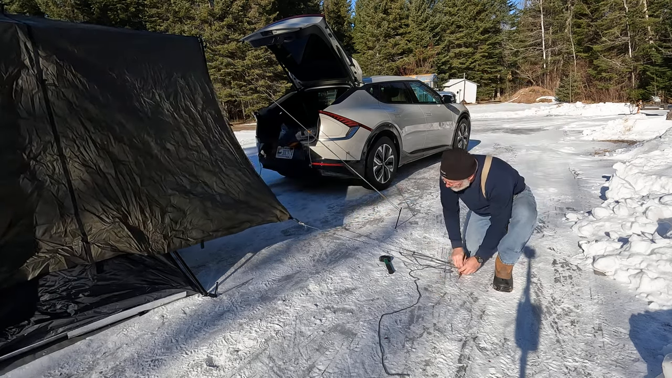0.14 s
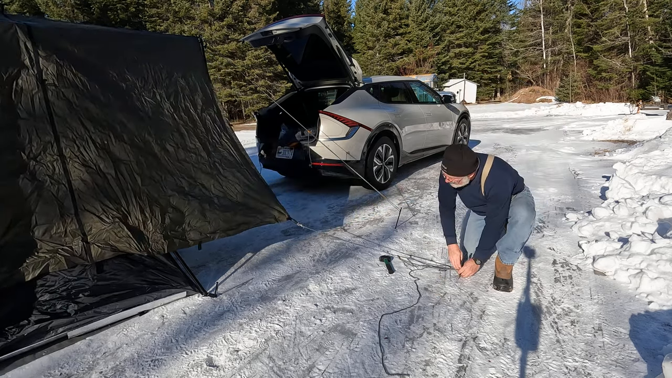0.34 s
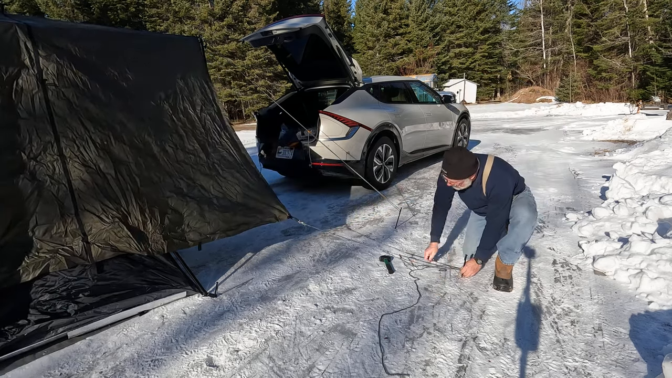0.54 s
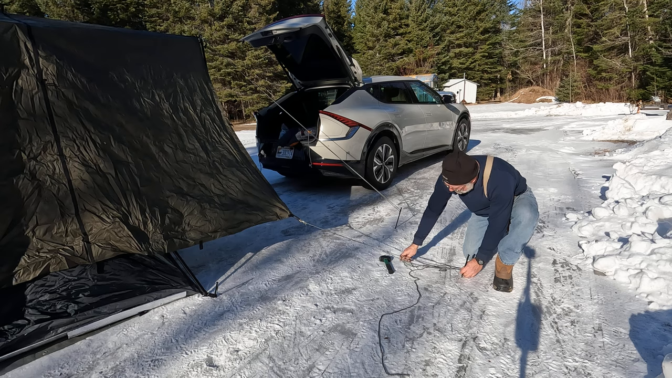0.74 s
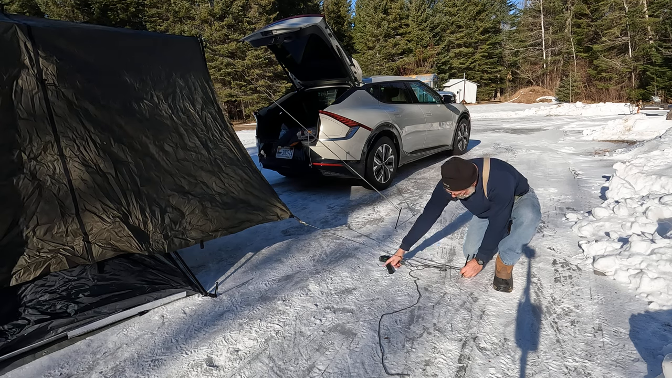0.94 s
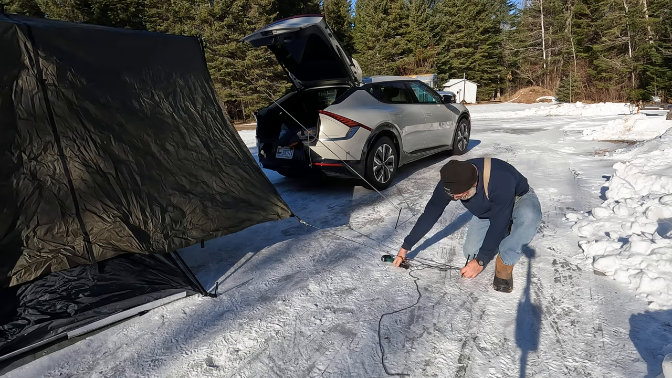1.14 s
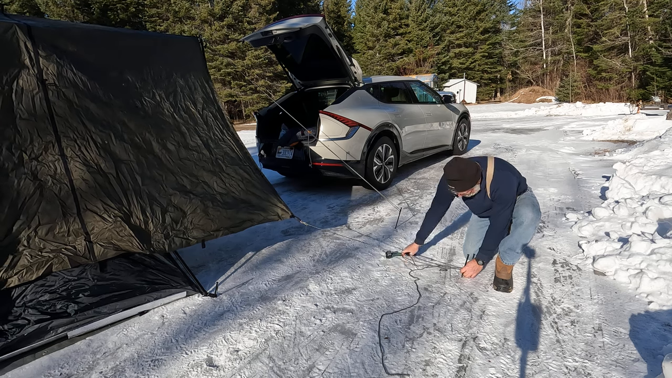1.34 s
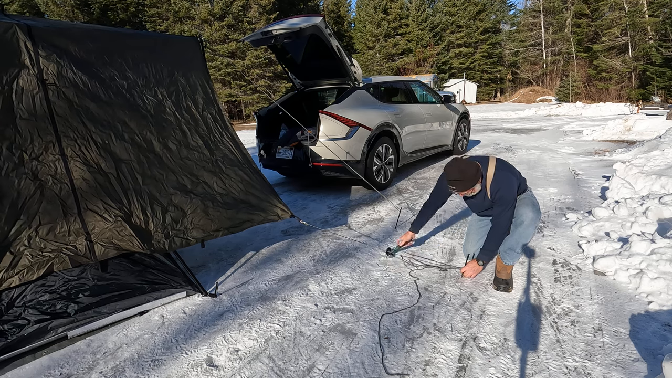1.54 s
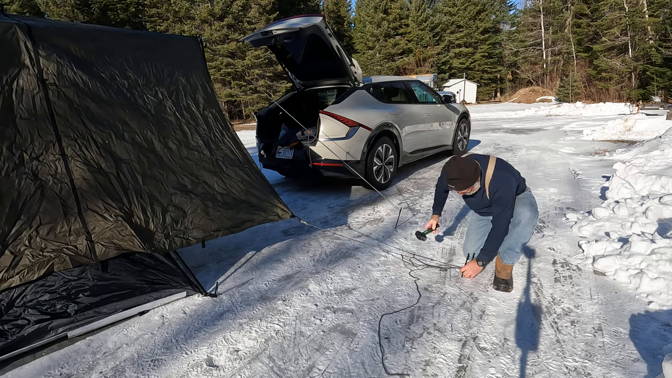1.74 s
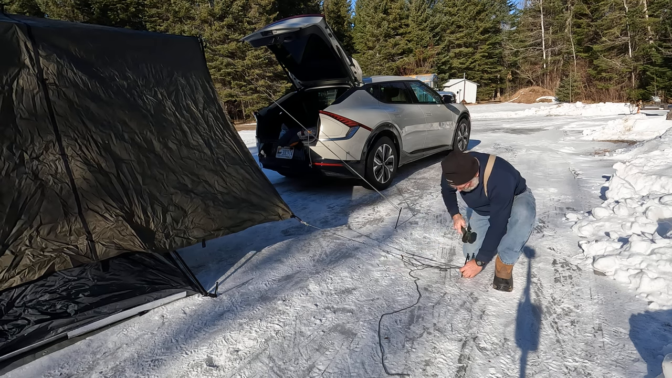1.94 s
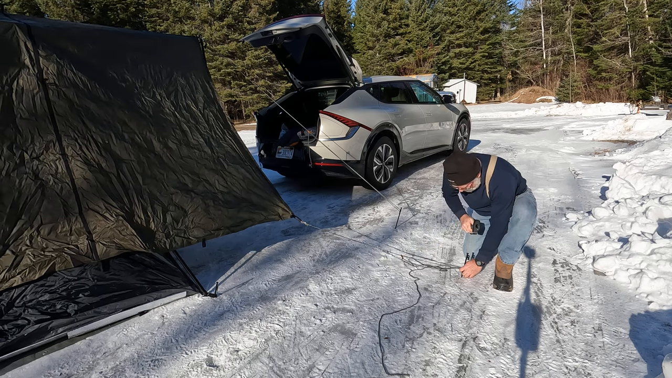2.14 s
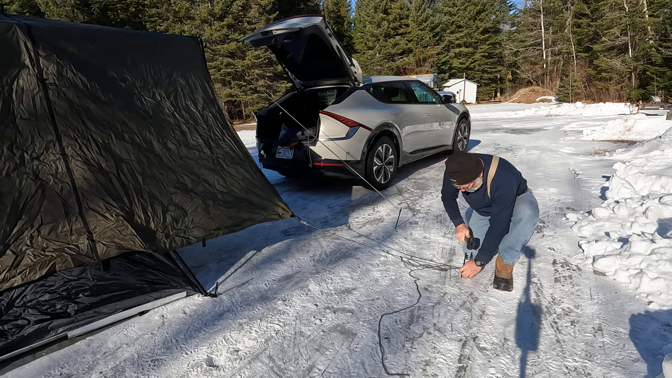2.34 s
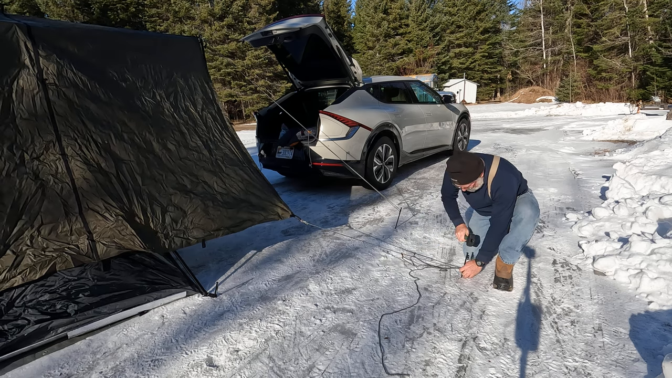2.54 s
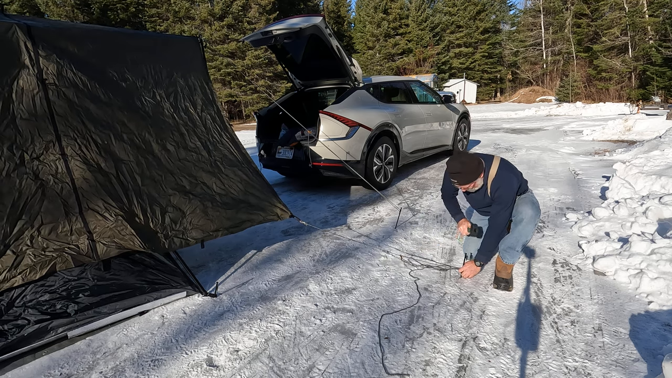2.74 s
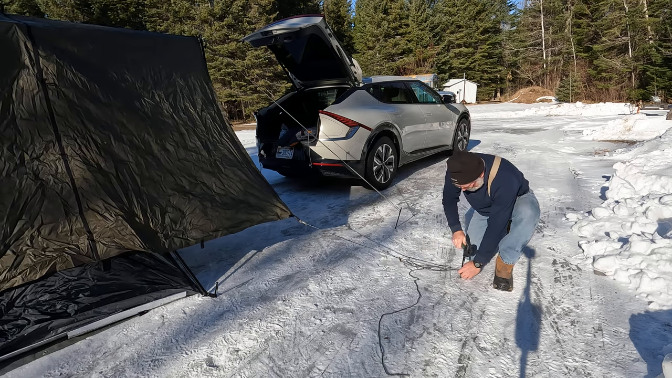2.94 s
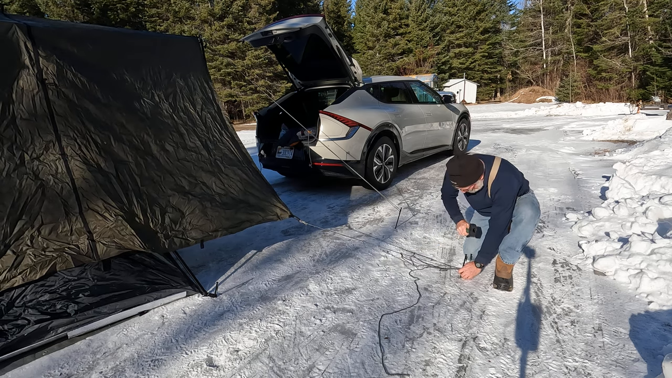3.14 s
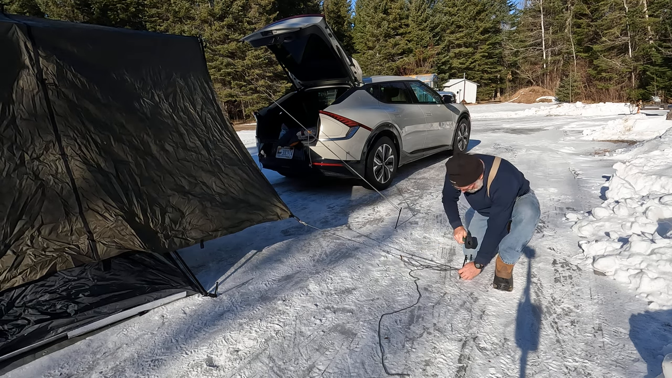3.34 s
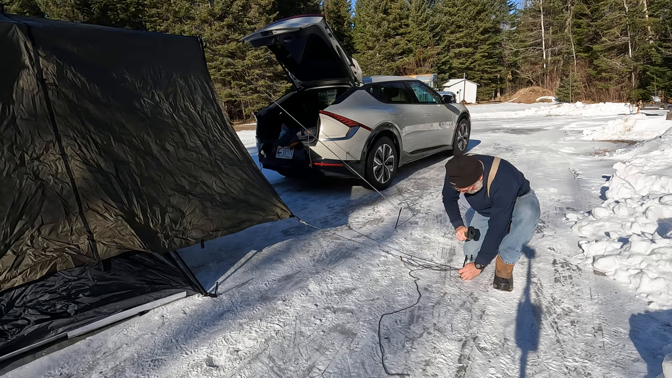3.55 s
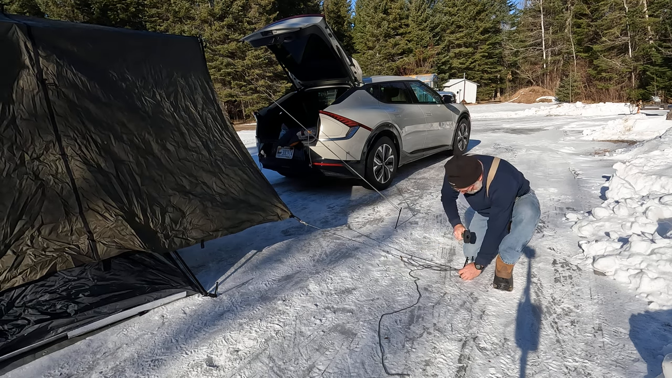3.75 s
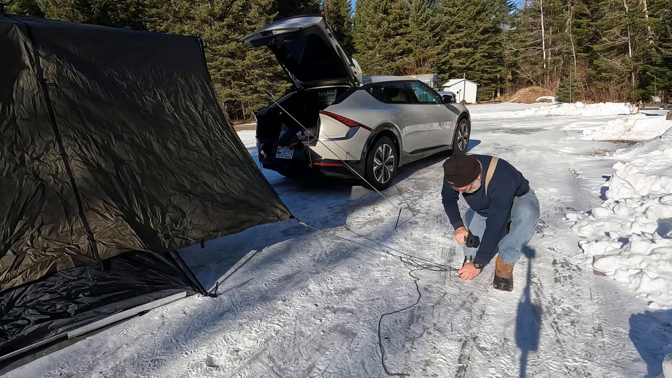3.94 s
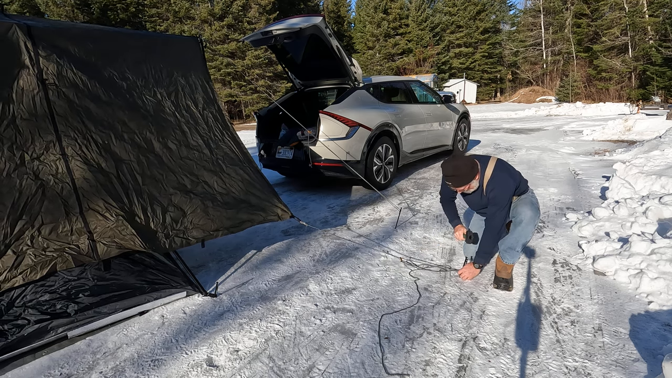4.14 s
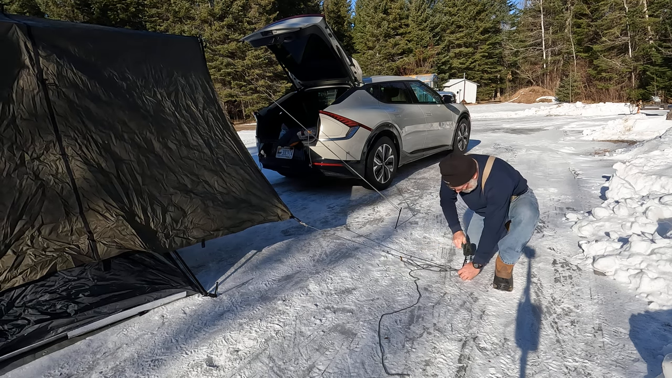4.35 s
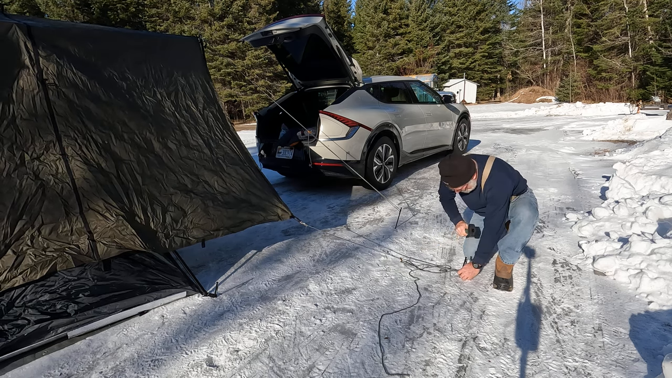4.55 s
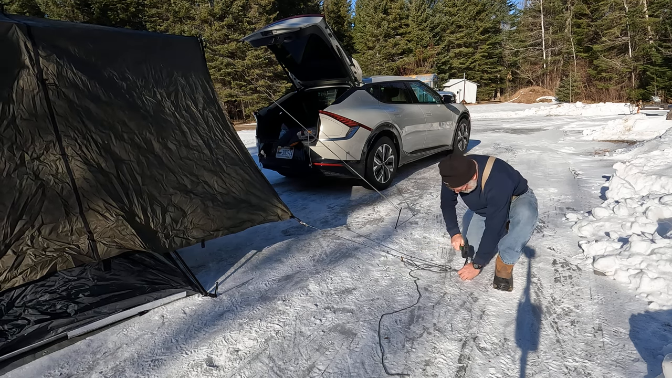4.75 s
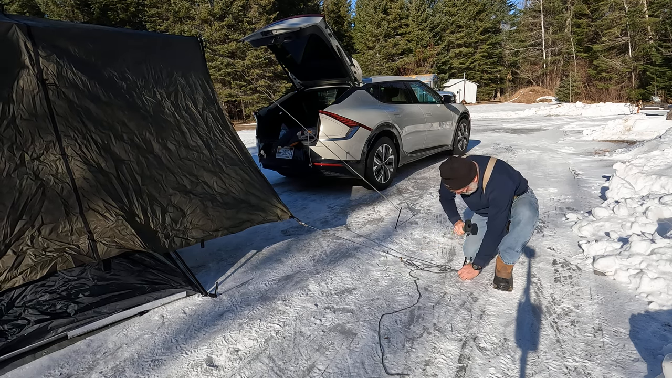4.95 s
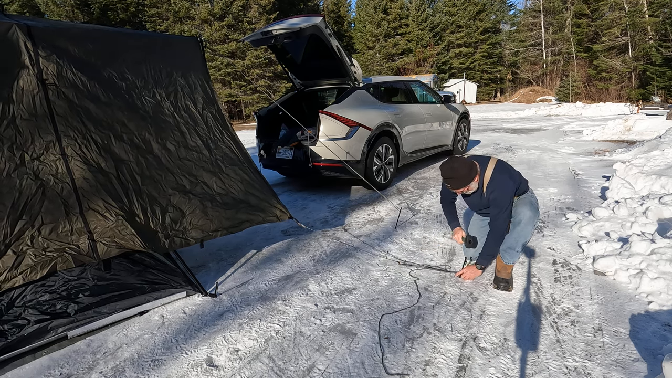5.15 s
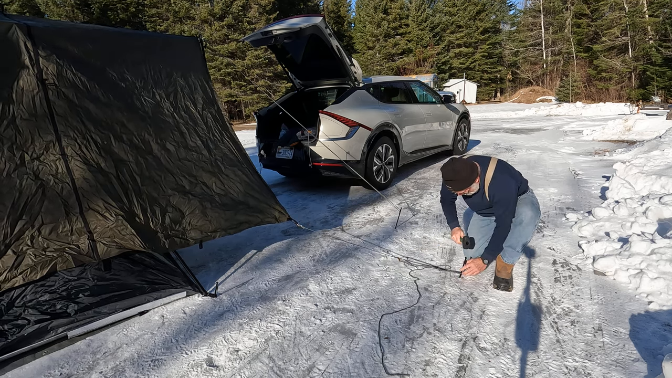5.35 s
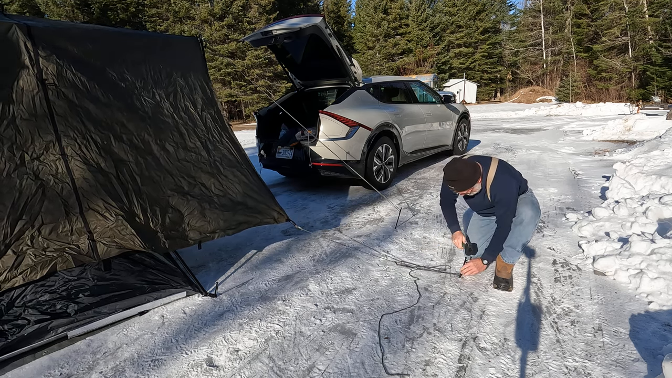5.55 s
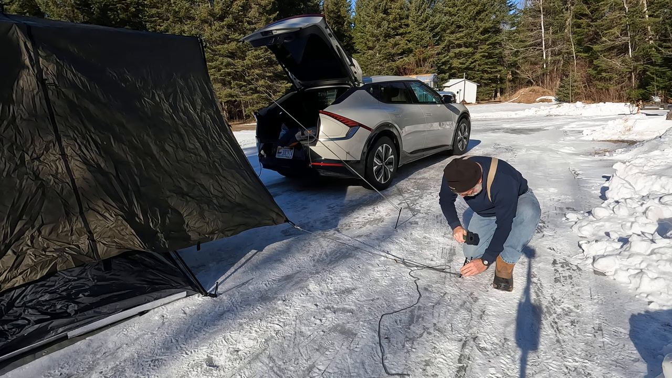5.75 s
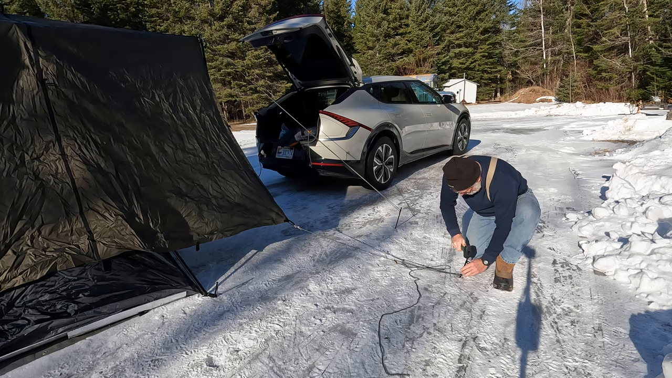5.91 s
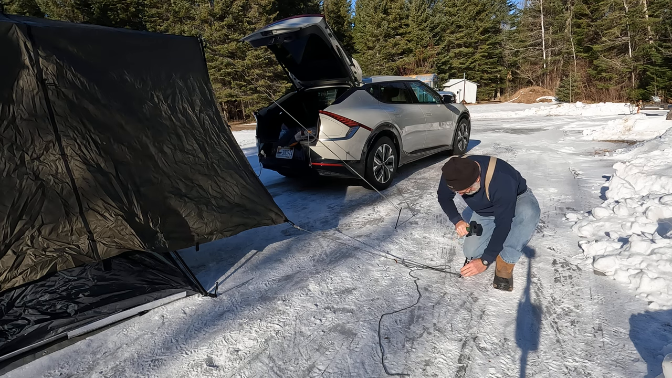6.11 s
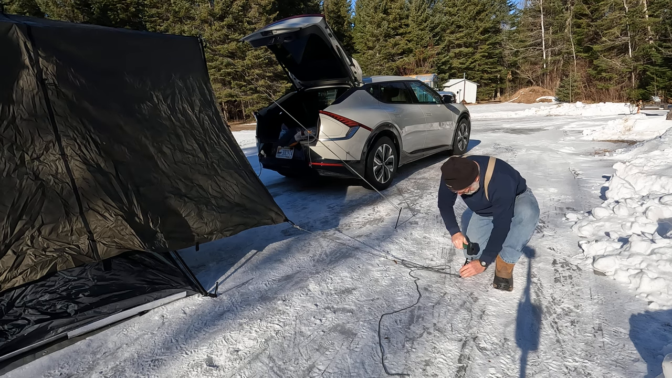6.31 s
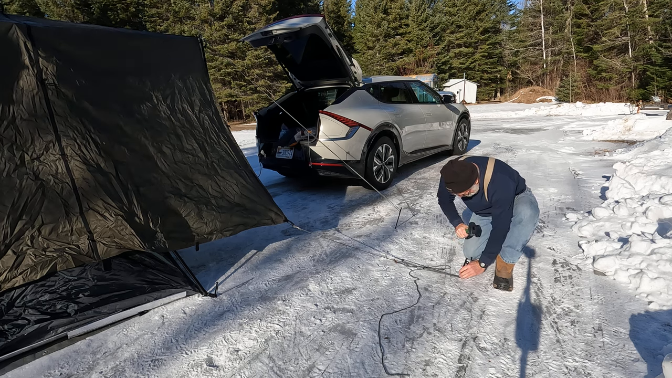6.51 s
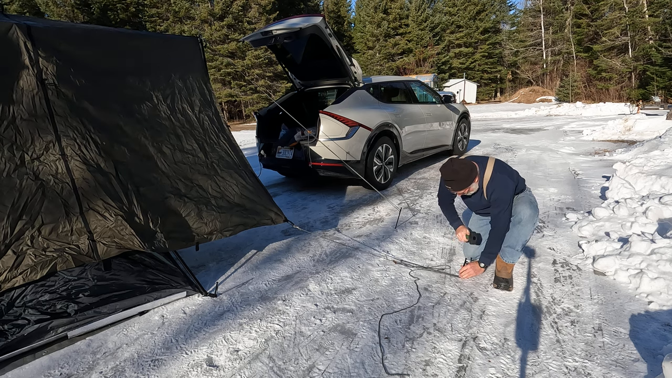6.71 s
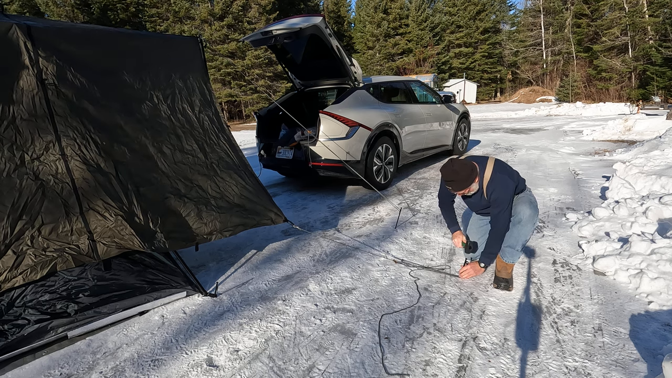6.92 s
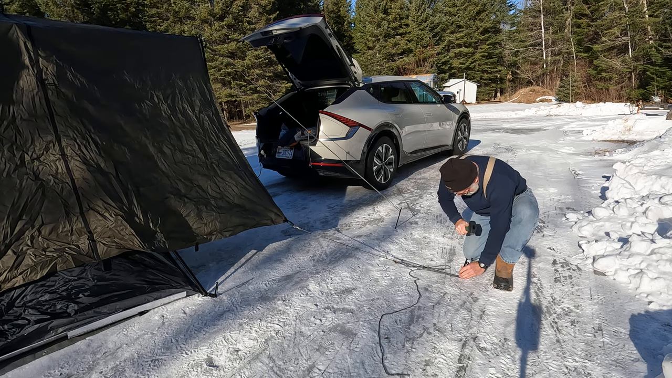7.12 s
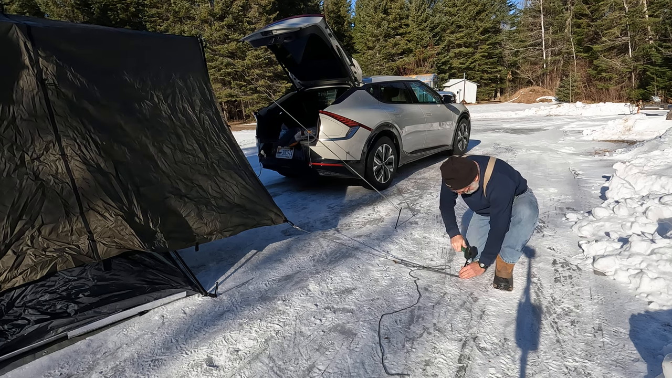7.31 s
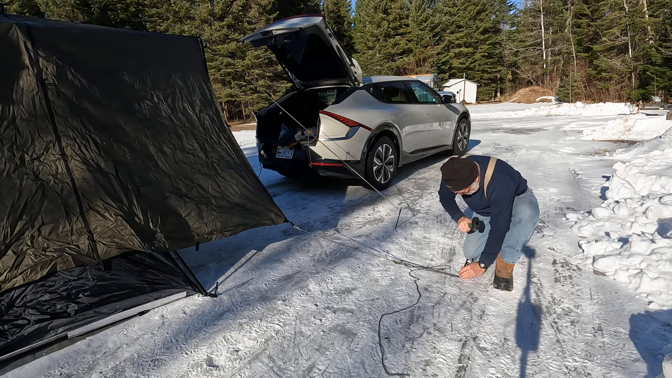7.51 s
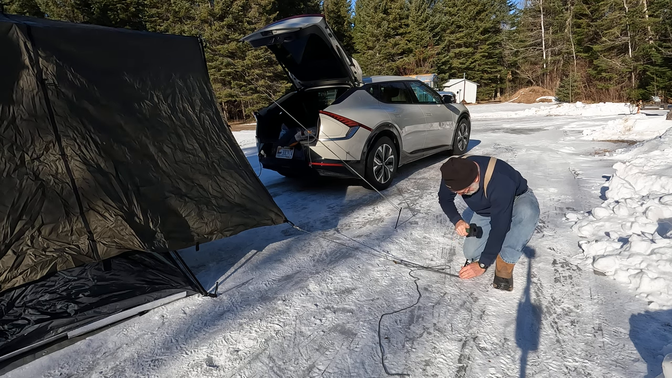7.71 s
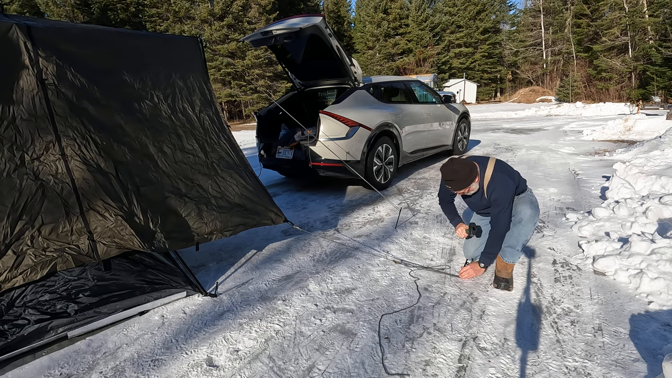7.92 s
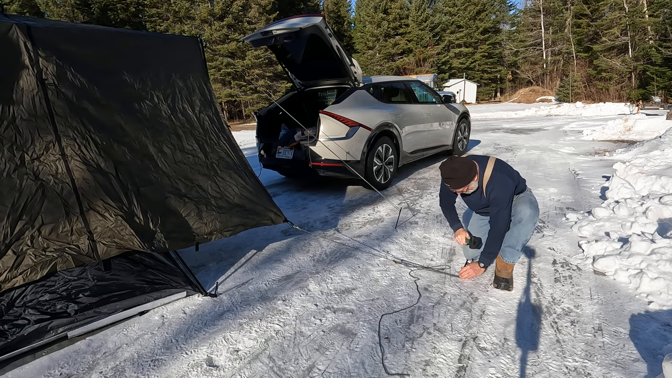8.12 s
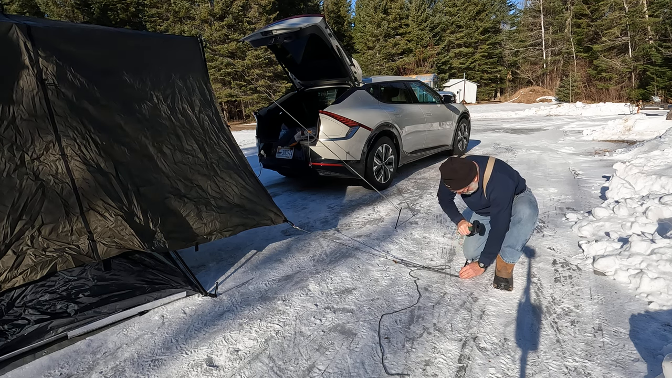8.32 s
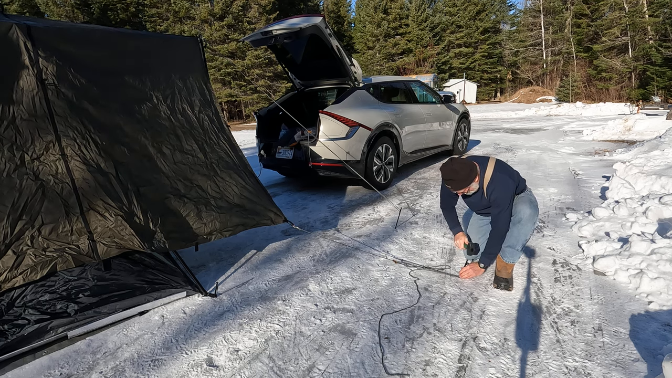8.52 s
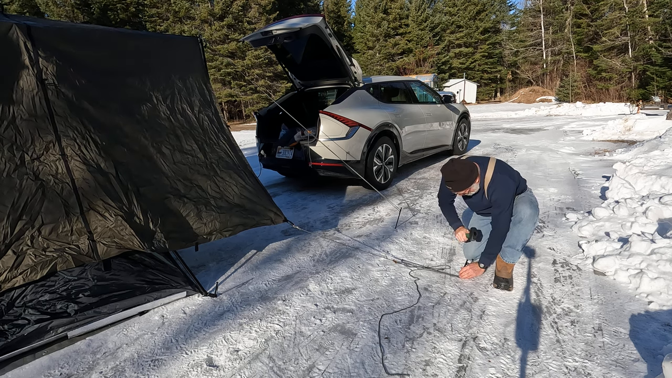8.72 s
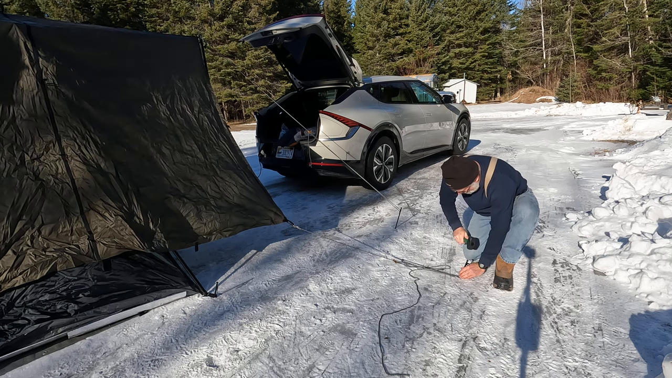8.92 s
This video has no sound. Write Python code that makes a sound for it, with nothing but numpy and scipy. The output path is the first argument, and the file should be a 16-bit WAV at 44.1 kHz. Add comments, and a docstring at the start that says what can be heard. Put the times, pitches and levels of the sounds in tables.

```python
"""A snowy forest campsite, the microphone close beside a steel tent stake and on the left channel only. A
hammer drives the stake into packed, icy snow in three runs of eight, five and three blows. The steel clanks,
tightens as it sinks and ends in a thud on the hard layer; each blow briefly overloads the input and ducks the
gain. Close by, ice chips scatter and hands and boots scuff the crust; far off, the forest gives a soft rush."""
import sys
import numpy as np
from scipy import signal
from scipy.fft import rfft, irfft, next_fast_len
from scipy.io import wavfile

SR = 44100
rng = np.random.default_rng(int(sys.argv[2]) if len(sys.argv) > 2 else 0)


def log_audio(samples):
    """Write samples as a 16-bit WAV file to the path given in sys.argv[1]."""
    # one column per channel
    frames = np.atleast_2d(samples).T
    # limit to full scale, then quantise
    limited = np.clip(frames, -1, 1)
    pcm = np.round(limited * 32767).astype(np.int16)
    wavfile.write(sys.argv[1], SR, pcm)


N = 395577
TIME = np.arange(N) / SR

# Hammer blows. Each row: start in seconds, force in dB, bending pitch in Hz, slide time in seconds,
# then extra bending, shaft ping and extra thud in dB.
BLOWS = [(2.3494, -7.5, 847, .0036, -1.5, -0.5, -12.5), (2.6564, -1.5, 963, 0.0093, 1, -1, -15),
         (2.967, 1, 1097, 0.0077, 8.5, -2.5, 8), (3.3209, 4, 1196, 0.0034, 4, -10.5, 3),
         (3.6732, 0.5, 1322, 0.0056, 1, 7, -16), (4.0603, 2.5, 1097, 0.0021, 0, 4.5, -6),
         (4.436, 3, 1230, 0.0018, -1.5, 7.5, -4.5), (4.801, 5.5, 1124, 0.0012, -7.5, 0, 1.5),
         (5.9611, 1, 1253, 0.00065, -6.5, 14.5, 7), (6.3093, -3.5, 1410, 0.0028, -4, 16, 8),
         (6.6731, 2.5, 1283, 0.0013, 6, 7, 2.5), (7.0122, 6, 1391, 0.0011, -3, -17, -3),
         (7.3713, 3, 1015, 0.00075, 0.5, 10.5, 0.5), (8.077, 0.5, 1047, .0004, 2.5, 5.5, -1),
         (8.503, 3, 878, .0005, 0.5, -9, 3), (8.8597, 1.5, 846, 0.00062, 9.5, -4, 2)]
# Clang of the steel. Each row: multiple of the clang pitch, relative level in dB.
CLANG_PARTIALS = [(1, 3.5), (1.2, -4.5), (1.38, -11), (1.56, -5), (1.86, -16), (2.41, -5.5), (3.29, -6.5)]
# Resonances. Each row: pitch in Hz, relative level in dB, time to fall 60 dB in seconds.
STAKE_TOP_MODES = [(3750, -39, 0.086), (4520, -38.5, 0.11), (5060, -48.5, 0.24), (7000, -43, 0.076),
                   (8850, -39, .17), (10800, -42.5, 0.13), (12100, -41, .16)]   # the free top of the stake
HELD_STAKE_MODES = [(3000, -5.5, 0.026), (3750, -5, 0.02), (4960, 4, 0.023), (5900, -4, 0.016),
                    (8750, -5, 0.077), (10500, -4, .03), (11100, -11, .02), (13500, -12, 0.017)]   # the stake in the hand
HAMMER_MODES = [(569, -3.5, 0.4), (810, -15, 0.018), (1650, -5, 0.052), (2567, 6.5, 0.043),
                (4000, 5.5, 0.0084), (7560, 5, 0.0053)]   # the hammer rubbed by ice
# Small sounds near the microphone. Each row: start in seconds, relative level in dB.
BRIGHT_TICKS = [(.3195, -39), (1.137, -29.5), (1.229, -30), (2.378, -24), (4.2056, -35.5), (5.136, -25.5),
                (5.2126, -26.5), (5.275, -34), (7.427, -16.5), (7.471, -23.5), (7.5004, -15.5),
                (7.537, -19.5), (7.5838, -31), (7.644, -19), (7.7279, -25.5), (8.1279, -15.5)]   # ice chips, a hammer bounce, and knocks as the hammer is lifted
STAKE_SCRATCHES = [(0.046, -39.5), (.32, -59), (.55, -51), (3.4, -54), (3.545, -44.5), (6.477, -36)]   # the hand shifts the stake against the ice
# Movement on the snow. Each row: start in seconds, length in seconds, level in dB.
CRUST_SCUFFS = [(.18, .29, -56), (1.12, .15, -43.5), (1.58, 0.085, -51.5), (1.85, 0.14, -50.5),
                (3.85, .14, -42.5), (4.88, 0.16, -50.5), (5.115, 0.076, -31.5), (5.17, 0.23, -46),
                (7.365, .155, -31), (8.08, 0.047, -21.5)]   # scuffs and sprays of icy crust
HAMMER_DRAGS = [(1.15, 0.052, -32.5), (1.222, 0.017, -33.5)]   # the hammer is picked up
BOOT_SHUFFLES = [(.355, 0.033, -35.5), (1.91, 0.084, -35.5), (2.1, 0.08, -38)]   # boot and knee shift
# Open air, slowly swelling. Each row: time in seconds, far rush in dB, low rumble in dB.
AIR_LEVELS = [(0, -39.3, -40.5), (1.5, -40.5, -46), (2.4, -37.5, -42), (3.5, -39.5, -41), (5.7, -38, -44.5),
              (7.6, -38.5, -45), (8.97, -40.5, -41)]
# Tone colours. Each row: frequency in Hz, relative level in dB.
CRUMBLE_COLOUR = [(200, -4.5), (1500, 4), (2600, -1), (3800, 1.5), (4350, -5), (5000, 3.5), (5900, -9.5),
                  (6900, -7.5), (7600, -12), (8500, -2.5), (9200, -11.5), (10100, -4.5), (12500, -13.5),
                  (16000, -19.5)]   # crust settling against the steel
TICK_COLOUR = [(300, -22), (1400, -5), (2200, 10), (5000, -0.5), (8000, -2), (11500, -0.5), (16000, -20)]   # short, bright ticks
SCUFF_COLOUR = [(300, -13.5), (1400, -7), (2400, -2), (5200, -3.5), (7000, -4.5), (11000, -3),
                (16000, -16.5)]   # gritty crust
SHUFFLE_COLOUR = [(80, -5.5), (400, 5), (850, 13), (1500, -0.5), (3000, -12.5), (12000, -23)]   # packed snow under weight
ECHO_COLOUR = [(30, -16), (150, 2.5), (500, 6.5), (1500, -14.5), (4000, -16.5), (9000, -8.5), (16000, 2)]   # scatter from the car, tent and snow banks
RUSH_COLOUR = [(76, -49), (130, -5.5), (150, -9), (211, -3), (297, -7.5), (462, 0), (735, 2.5),
               (1400, -8.5), (2050, -18), (2320, -20), (2890, -26.5), (5180, -33), (15100, -35.5),
               (16000, -45.5)]   # the distant forest
RUMBLE_COLOUR = [(15, -1), (35, -5), (55, 2), (80, 3.5), (120, -9.5), (220, -24), (600, -52.5)]   # the low end of the open air
IDLE_COLOUR = [(20, 2), (40, -8), (80, -14), (200, -28), (500, -30), (1500, -30.5), (14000, -37)]   # the empty right channel

# Sinking shifts the balance of the clank. Each pair: level in dB at the first blow, change in dB per blow.
BENDING_LEVEL, OVERTONE_LEVEL, HEAD_LEVEL = (11.7, -0.34), (4.7, 0.4), (13.6, -0.89)
CLANG_LEVEL, GRIND_LEVEL = (3.6, 0.46), (0, 0.78)
HEAD_HZ, HANDLE_HZ, CLANG_HZ, PING_HZ = 1559, 550, 3690, 9956   # the ping rings along the shaft
OVERTONE_HZ, OVERTONE_HZ_PER_BLOW = 2847, -26.5   # the second bending mode sags as snow grips more shaft
OVERTONE_SPLIT = 0.11   # the shaft is stiffer one way: its two planes lie this share off the pitch
SOFT_THUD_DB, HARD_THUD_DB, HARD_LAYER_BLOW, HARD_LAYER_WIDTH_BLOWS = -4, 19.5, 10.53, 0.66
GRIT_FROM_S, GRIT_UNTIL_S = 2.3, 8.3   # faint grit and stray ticks during the hammering


def hammer_blows(damped_t60=0.025, choke_t60=0.016, pitch_scatter=0.03, size=16384):
    """The steel rings while the stake slides; once it sticks, snow chokes it and the crust thuds."""
    out, t = np.zeros(N), TIME[:size]
    for blow, (s, force_db, bending_hz, slide_s, extra_db, ping_db, thud_db) in enumerate(BLOWS):
        gripped = gripped_time(size)
        overtone_shift, clang_shift = 1 + pitch_scatter * rng.standard_normal(2)
        bending_db = sunk_db(BENDING_LEVEL, blow) + extra_db
        overtone_hz = (OVERTONE_HZ + OVERTONE_HZ_PER_BLOW * blow) * overtone_shift
        overtone_db, clang_db = sunk_db(OVERTONE_LEVEL, blow), sunk_db(CLANG_LEVEL, blow)
        overtones = sum(tone(gripped, overtone_hz * (1 + plane * OVERTONE_SPLIT), overtone_db)
                        for plane in (-1, 1))
        bending = tone(gripped, bending_hz, bending_db) - overtones
        head = tone(t, HEAD_HZ, sunk_db(HEAD_LEVEL, blow))
        handle = tone(t, HANDLE_HZ, bending_db - 13)
        ping = tone(t, PING_HZ, ping_db)
        clang = sum((-1) ** k * tone(gripped, CLANG_HZ * clang_shift * ratio, clang_db + db)
                    for k, (ratio, db) in enumerate(CLANG_PARTIALS))
        grind = from_db(sunk_db(GRIND_LEVEL, blow)) * dull_noise(size, pole=0.49)
        decay = fade(t, damped_t60) * fade(np.maximum(t - slide_s, 0), choke_t60)
        clank = (bending + head + handle + ping + clang + grind) * decay
        # The thud grows within a few blows as the stake meets the hard layer.
        hardness = 1 / (1 + np.exp((HARD_LAYER_BLOW - blow) / HARD_LAYER_WIDTH_BLOWS))
        layer_db = SOFT_THUD_DB + (HARD_THUD_DB - SOFT_THUD_DB) * hardness
        thud = from_db(layer_db + thud_db) * crust_thud(t)
        add(out, s, from_db(force_db) * (clank + thud))
    return out


def gripped_time(size, wobble=0.062, wobble_hz=350):
    """Ice grips and frees the stake unevenly: a wavering clock that bends its modes together."""
    grip = dull_noise(size, pole=np.exp(-2 * np.pi * wobble_hz / SR))
    return np.cumsum(1 + wobble * grip) / SR


def sunk_db(level, blow):
    """Level of one part of the clank after so many blows."""
    first_db, db_per_blow = level
    return first_db + db_per_blow * blow


def crust_thud(t, sweep_rad_s=0.043, travel_s=0.0015, rise_s=0.00017):
    """Highs outrun lows in frozen crust, so the pitch dives; a short knock, then a slow, very low swing."""
    age = t + travel_s
    onset = 1 - np.exp(-t / rise_s)
    wave = np.sin(sweep_rad_s / age) * travel_s / age * onset * fade(t, t60=0.068)
    knock = mode(t - 0.0026, hz=350, db=-13, t60=0.0031)
    low_swing = mode(t - 0.026, hz=14, db=-17, t60=0.056)
    return wave - knock + low_swing


def stake_top_ring(scatter_db=3.5, detune=0.11, size=16384):
    """The free top of the stake sings on faintly, its modes changing with how each blow lands."""
    out, t = np.zeros(N), TIME[:size]
    for s, *_ in BLOWS:
        for hz, db, t60 in STAKE_TOP_MODES:
            strength, shift = rng.standard_normal(2)
            add(out, s, mode(t, hz * (1 + detune * shift), db + scatter_db * strength, t60))
    return out


def crust_crumble(level_db=-27.5, t60=0.21, size=16384):
    """After each blow the crust settles against the steel in a short hiss of fractures."""
    out, fractures = np.zeros(N), grains(per_s=17000, spread_db=3.5)
    for blow, (s, *_) in enumerate(BLOWS):
        hiss = rms_one(coloured(fractures[blow * size:(blow + 1) * size], CRUMBLE_COLOUR))
        add(out, s, hiss * fade(TIME[:size], t60))
    return from_db(level_db) * out


def bright_ticks(gain_db=5, t60=0.015, size=2048):
    """Short, bright ticks close by: ice chips, a hammer bounce, and knocks as the hammer is lifted."""
    out = np.zeros(N)
    for s, db in list(BRIGHT_TICKS) + stray_ticks():
        add(out, s, from_db(db + gain_db) * rng.standard_normal(size) * fade(TIME[:size], t60))
    return coloured(out, TICK_COLOUR)


def stray_ticks(per_s=11, typical_db=-46, scatter_db=3, count=96):
    """Crumbs knocked loose during the hammering. Each row: start in seconds, relative level in dB."""
    starts = GRIT_FROM_S + np.cumsum(rng.exponential(1 / per_s, count))
    levels = typical_db + scatter_db * rng.standard_normal(count)
    return [(s, db) for s, db in zip(starts, levels) if s < GRIT_UNTIL_S]


def stake_scratches(scatter_db=4.0, grip_detune=0.034, scratch_t60=0.065, size=8192):
    """A brief scratch on ice rings the stake; the changing grip shifts each mode's strength and pitch."""
    out, t = np.zeros(N), TIME[:size]
    for s, touch_db in STAKE_SCRATCHES:
        strengths, shifts = rng.standard_normal((2, len(HELD_STAKE_MODES)))
        ring = sum(mode(t, hz * (1 + grip_detune * shift), db + scatter_db * strength, t60)
                   for (hz, db, t60), strength, shift in zip(HELD_STAKE_MODES, strengths, shifts))
        scratch = rng.standard_normal(size) * fade(t, scratch_t60)
        add(out, s, from_db(touch_db) * signal.fftconvolve(scratch / np.linalg.norm(scratch), ring))
    return out


def crust_scuffs(faint_db=-63, swing_db=5.5):
    """Scuffed crust breaks in a run of tiny fractures; faint grit goes on during the hammering."""
    window = (TIME > GRIT_FROM_S) & (TIME < GRIT_UNTIL_S)
    faint = window * from_db(faint_db + swing_db * wander(per_s=7.9))
    grit = rms_one(coloured(grains(per_s=1600, spread_db=3.5), SCUFF_COLOUR))
    return (swells(CRUST_SCUFFS) + faint) * grit


def hammer_drags(size=8192):
    """Rough ice rubs the hammer as it is picked up and sets it ringing."""
    ring = sum(mode(TIME[:size], hz, db, t60) for hz, db, t60 in HAMMER_MODES)
    rubbing = grains(per_s=3000, spread_db=2.0)
    return swells(HAMMER_DRAGS) * rms_one(signal.fftconvolve(rubbing, ring)[:N])


def boot_shuffles():
    """Packed snow gives a dull crunch under shifting weight."""
    crunch = rms_one(coloured(grains(per_s=2500, spread_db=5.0), SHUFFLE_COLOUR))
    return swells(BOOT_SHUFFLES) * crunch


def campsite_echoes(x, near_db=-32, near_t60=0.07, far_db=-34, far_t60=0.25, delay_s=0.0078, size=16384):
    """Weak scatter reaches the microphone from the body and ground close by, and from farther off."""
    t = TIME[:size] - delay_s
    near = from_db(near_db) * fade(t, near_t60) / np.sqrt(near_t60)
    far = from_db(far_db) * fade(t, far_t60) / np.sqrt(far_t60)
    energy_scale = np.sqrt(2 * np.log(1000) / SR)
    echoes = coloured(rng.standard_normal(size), ECHO_COLOUR) * (near + far) * energy_scale
    return signal.fftconvolve(x, echoes)[:N]


def forest_air():
    """A smooth, distant rush over a low rumble, both slowly swelling."""
    s, rush_db, rumble_db = np.transpose(AIR_LEVELS)
    rush = from_db(np.interp(TIME, s, rush_db)) * steady_noise(RUSH_COLOUR)
    rumble = from_db(np.interp(TIME, s, rumble_db)) * steady_noise(RUMBLE_COLOUR)
    return rush + rumble


def from_db(db):
    """Decibels to gain."""
    return 10 ** (np.asarray(db) / 20)


def rms_one(x):
    """Scale to unit power."""
    return x / np.sqrt(np.mean(x ** 2) + 1e-20)


def add(track, s, sound):
    """Mix a sound into a track, starting at s seconds."""
    start = max(round(s * SR), 0)
    track[start:start + len(sound)] += sound[:N - start]


def coloured(x, colour):
    """Filter by a tone colour, its points joined by straight lines on a log-frequency axis."""
    hz, db = np.transpose(colour)
    size = next_fast_len(len(x))
    bins = np.maximum(np.fft.rfftfreq(size, 1 / SR), 1)
    gain = from_db(np.interp(np.log(bins), np.log(hz), db))
    return irfft(rfft(x, size) * gain, size)[:len(x)]


def steady_noise(colour):
    """Unit-power noise of a given tone colour."""
    return rms_one(coloured(rng.standard_normal(N), colour))


def dull_noise(size, pole):
    """Unit-power noise with its treble rolled off by one pole."""
    return rms_one(signal.lfilter([1], [1, -pole], rng.standard_normal(size)))


def tone(t, hz, db):
    """A sine with zero phase at time zero."""
    return from_db(db) * np.sin(2 * np.pi * hz * t)


def fade(t, t60):
    """Decay by 60 dB in t60 seconds, silent before time zero."""
    return np.exp(-np.log(1000) * np.abs(t) / t60) * (t >= 0)


def mode(t, hz, db, t60):
    """One struck resonance."""
    return tone(t, hz, db) * fade(t, t60)


def swells(rows):
    """An arched envelope for each movement."""
    out = np.zeros(N)
    for s, length_s, db in rows:
        add(out, s, from_db(db) * np.sqrt(np.hanning(int(length_s * SR))))
    return out


def grains(per_s, spread_db):
    """Random fractures of uneven size."""
    sizes = from_db(spread_db * np.minimum(rng.exponential(1, N), 4))
    return sizes * rng.choice([-1, 1], N) * (rng.random(N) < per_s / SR)


def wander(per_s):
    """A slow random swing of about unit spread."""
    steps = rng.standard_normal(1024)
    return np.interp(TIME * per_s, np.arange(len(steps)), steps)


def scene(idle_db=-55):
    """The microphone feeds the left channel; the right holds only faint idle noise."""
    close = hammer_blows() + stake_top_ring() + crust_crumble() + bright_ticks()
    close += stake_scratches() + crust_scuffs() + hammer_drags() + boot_shuffles()
    left = close + campsite_echoes(close) + forest_air()
    right = from_db(idle_db) * steady_noise(IDLE_COLOUR)
    return np.array([left, right])


def gain_control(x, threshold_db=-4, slope=0.48, depth_db=14, release_db_per_s=21, attack_s=0.0043):
    """A loud peak pulls the gain down, too late for the blow itself; the air creeps back afterwards."""
    peak_db = 20 * np.log10(np.abs(x).max(axis=0) + 1e-9)
    cut_db = np.clip(slope * (peak_db - threshold_db), 0, depth_db)
    release_db = release_db_per_s * TIME
    held_db = np.maximum.accumulate(cut_db + release_db) - release_db
    pole = np.exp(-1 / (attack_s * SR))
    return x * from_db(-signal.lfilter([1 - pole], [1, -pole], held_db))


def record(dry, ceiling=0.88, stopband_hz=16500):
    """Behind the microphone: gain control, overload that flattens the blows, and a steep top cut."""
    drive = gain_control(dry) / ceiling
    flattened = ceiling * drive / (1 + drive ** 4) ** 0.25
    top_cut = signal.cheby2(12, 45, stopband_hz, fs=SR, output="sos")
    return signal.sosfiltfilt(top_cut, flattened)


dry = scene()
out = record(dry)
log_audio(out)
```